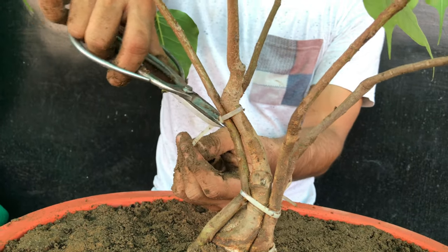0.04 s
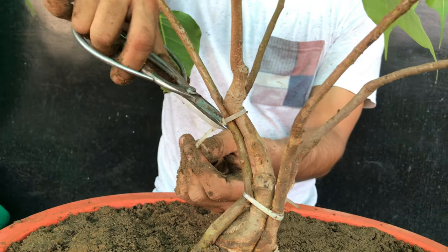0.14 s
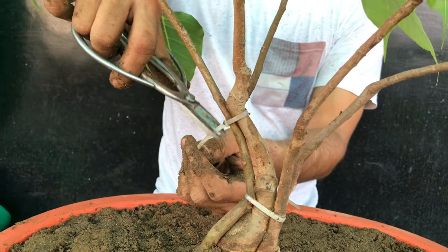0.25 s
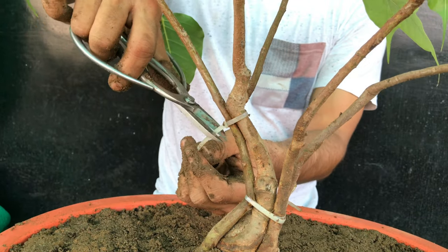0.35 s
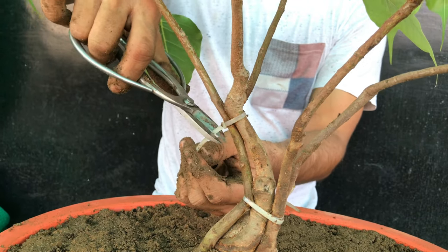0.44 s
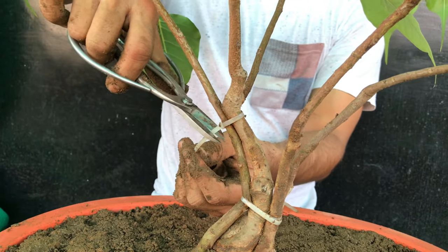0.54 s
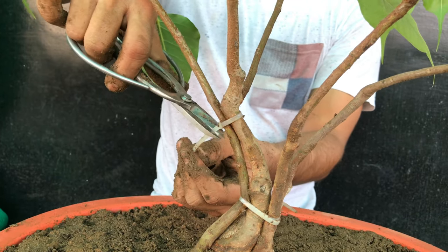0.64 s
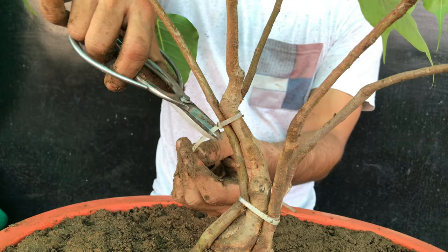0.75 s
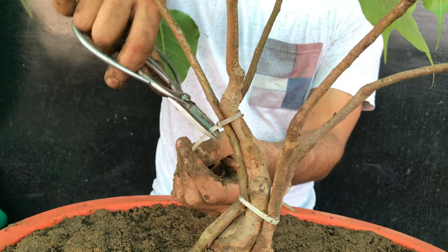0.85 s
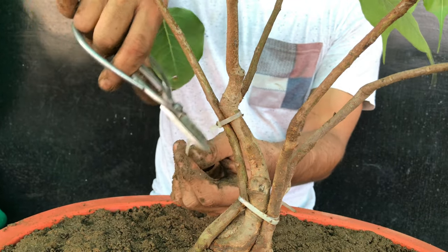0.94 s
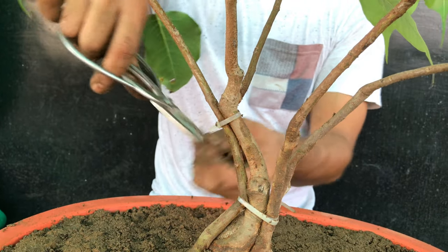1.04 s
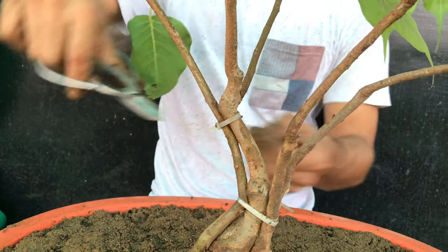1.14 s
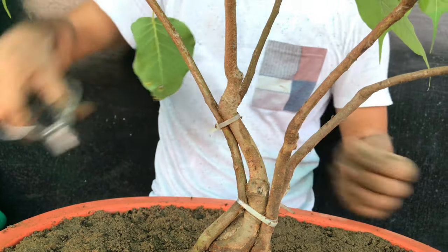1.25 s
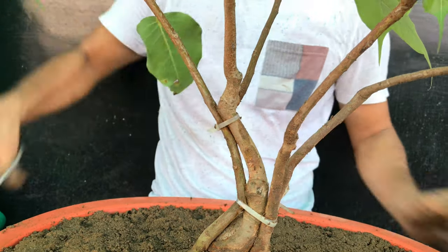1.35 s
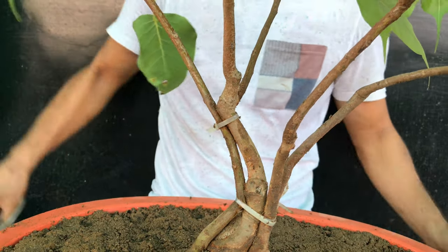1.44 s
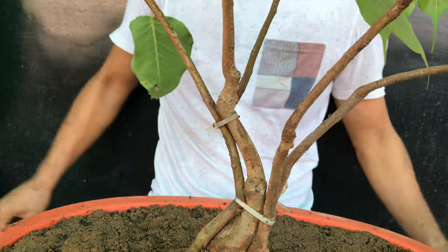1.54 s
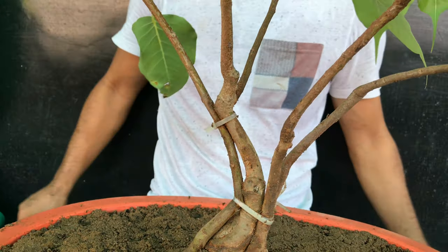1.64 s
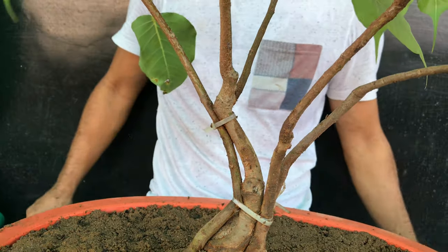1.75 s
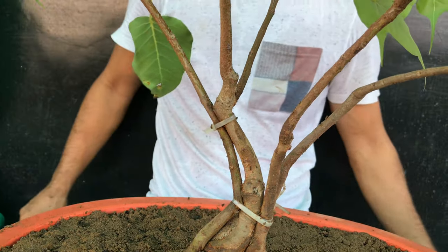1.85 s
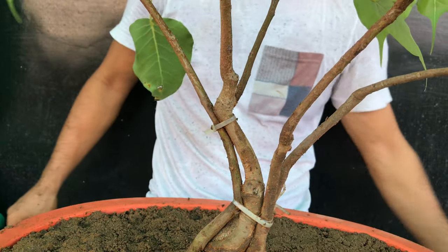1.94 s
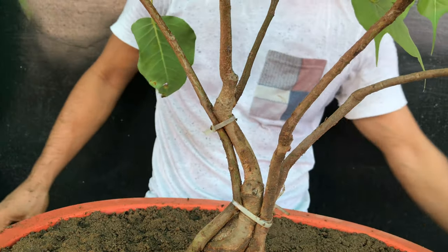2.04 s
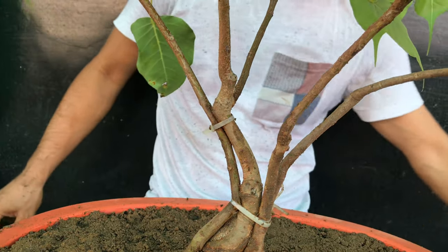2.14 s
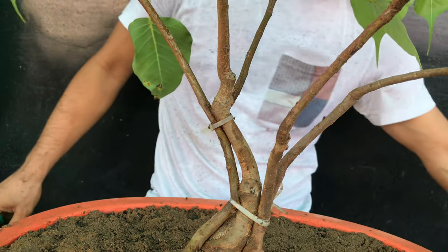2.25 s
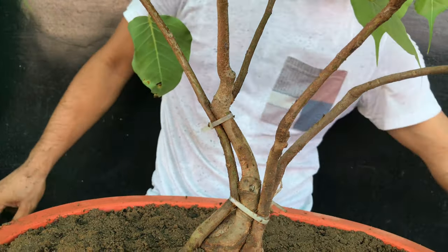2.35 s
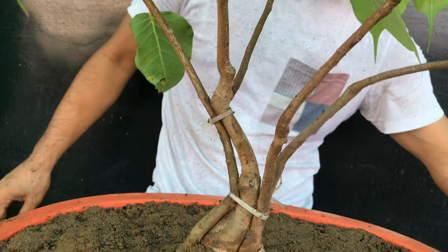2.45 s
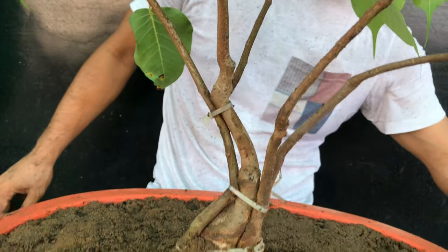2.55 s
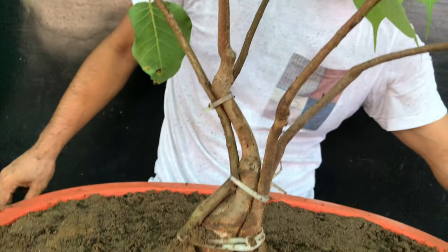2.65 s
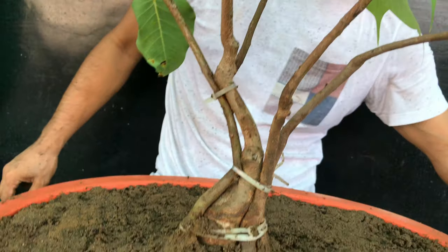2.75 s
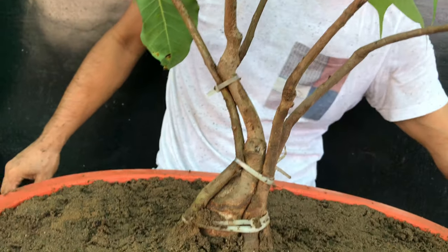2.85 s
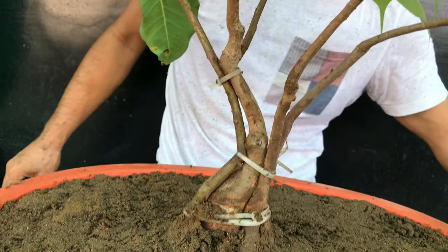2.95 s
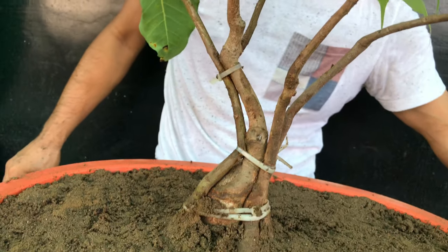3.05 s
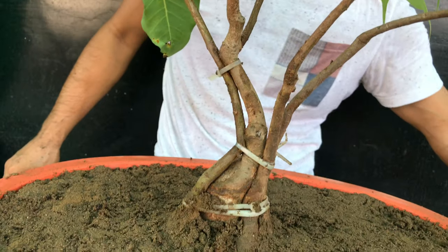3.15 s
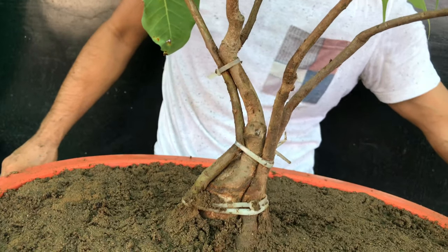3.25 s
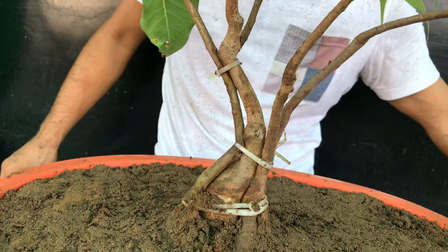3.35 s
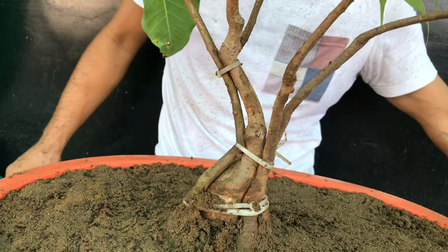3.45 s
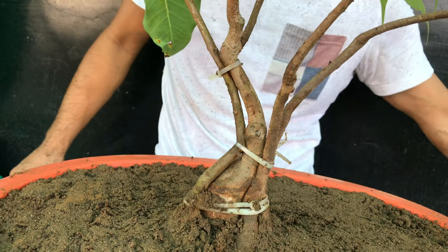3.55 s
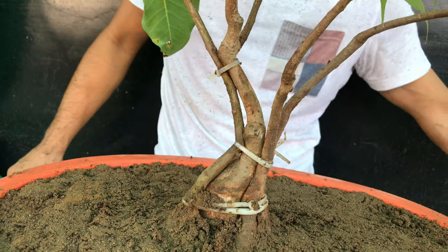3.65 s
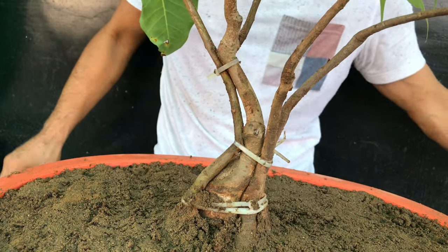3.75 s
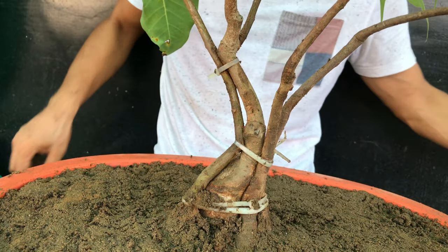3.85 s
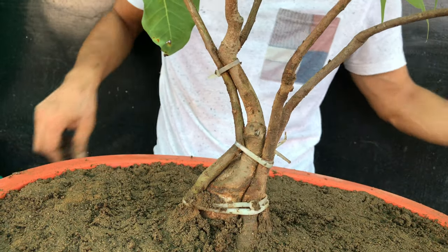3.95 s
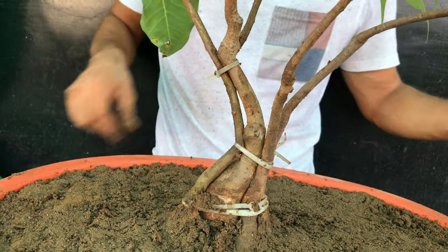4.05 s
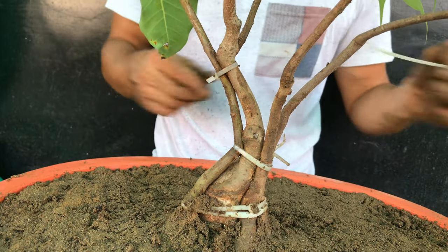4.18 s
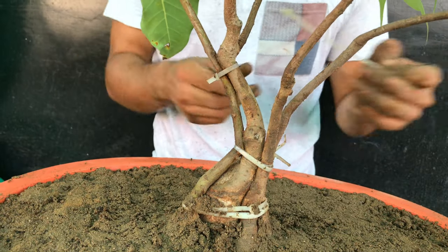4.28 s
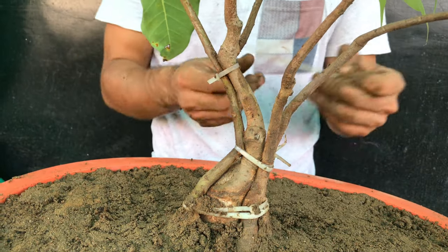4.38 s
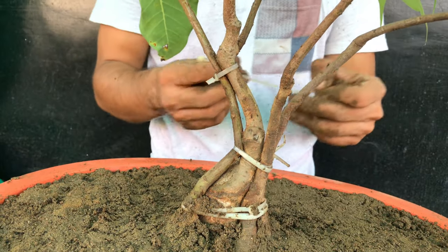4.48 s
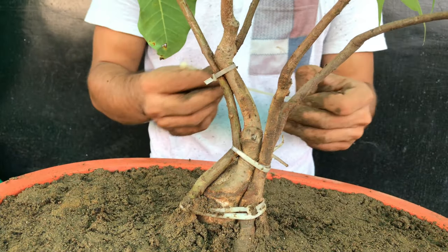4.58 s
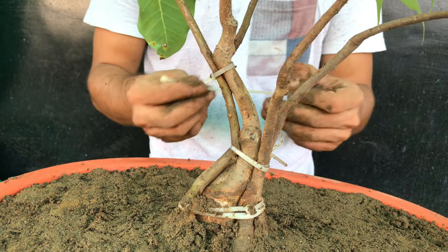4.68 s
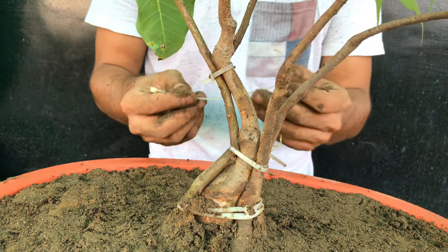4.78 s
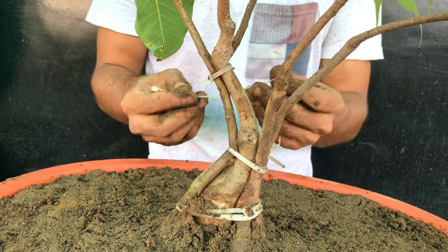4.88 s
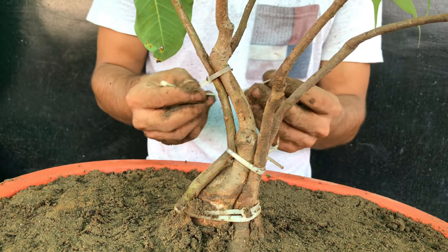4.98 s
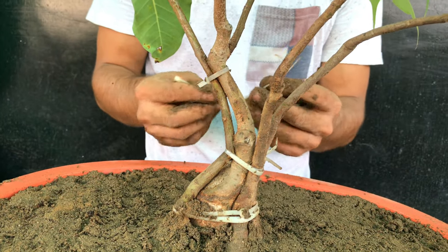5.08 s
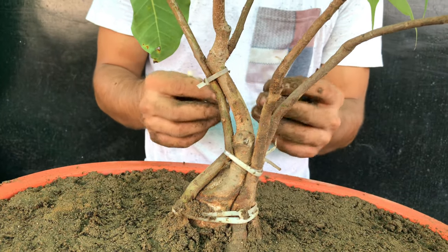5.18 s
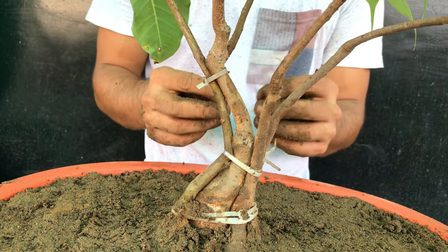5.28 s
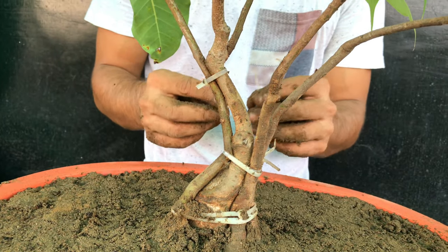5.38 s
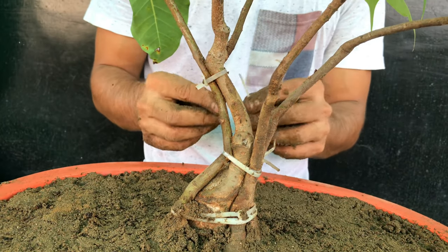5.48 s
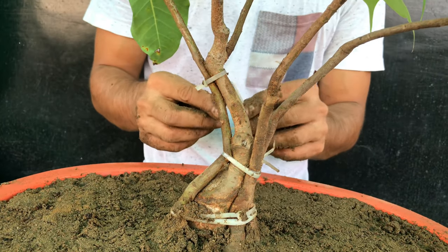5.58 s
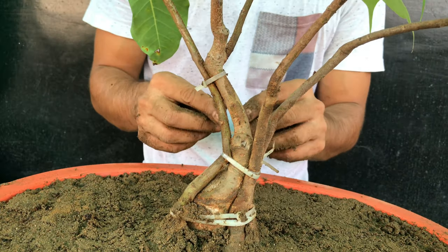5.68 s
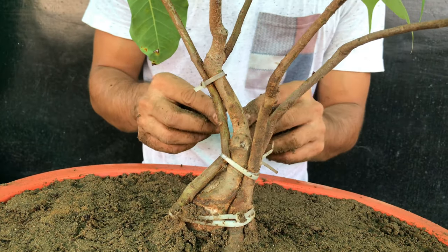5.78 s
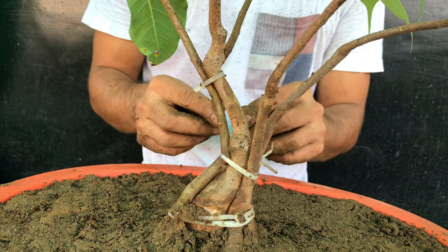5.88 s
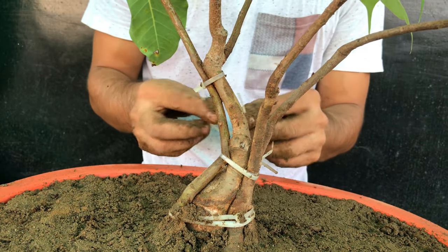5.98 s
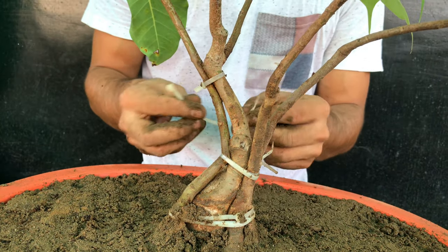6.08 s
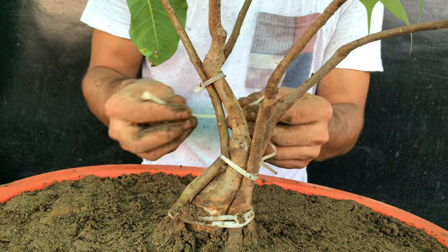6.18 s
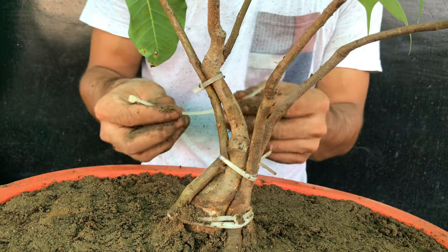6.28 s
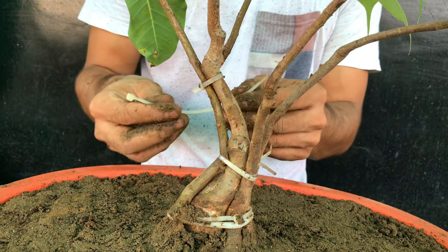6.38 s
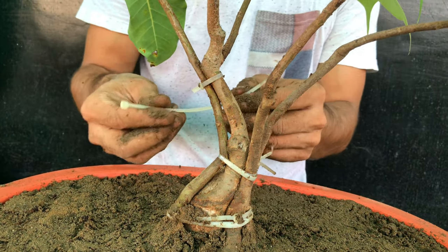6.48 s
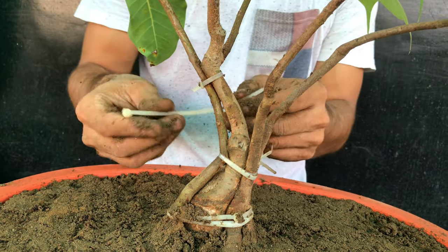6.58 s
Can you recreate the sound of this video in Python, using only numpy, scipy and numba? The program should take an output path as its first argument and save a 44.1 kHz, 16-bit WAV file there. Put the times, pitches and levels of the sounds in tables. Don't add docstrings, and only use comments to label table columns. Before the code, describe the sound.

One sharp metallic scissor snip, then a clattering drop to the ground, gritty rustles and plastic ticks over low town rumble and faint birds.

```python
import sys
import numpy as np
from scipy import signal
from scipy.fft import rfft, irfft
from scipy.io import wavfile
from scipy.ndimage import uniform_filter1d
from numba import njit

SR = 44100
rng = np.random.default_rng(int(sys.argv[2]) if len(sys.argv) > 2 else 0)


def unload_wav(signal):
    wavfile.write(
        sys.argv[1],
        SR,
        np.round(np.clip(np.atleast_2d(signal).T, -1, 1) * 32767).astype(np.int16),
    )


def makeup_ratio(level_db):
    decades = np.asarray(level_db, float) / 20
    return 10 ** decades


N = 291942
T = np.arange(N) / SR


def band(x, hz, width):
    centre_hz, width_hz = min(hz, .45 * SR), min(width, .35 * SR)
    return signal.lfilter(*signal.iirpeak(centre_hz, hz / width_hz, fs=SR), x)


def level(x, db):
    return x * makeup_ratio(db) / np.sqrt(np.mean(x ** 2))


def walk(rate):
    hold = int(SR / rate)
    steps = np.repeat(rng.standard_normal(N // hold + 1), hold)
    return 2.2 * uniform_filter1d(uniform_filter1d(steps, hold), hold)[:N]


def colour(x, spectrum):
    hz, db = np.transpose(spectrum)
    f = np.maximum(np.arange(N // 2 + 1) * SR / N, 1)
    gain_db = np.interp(np.log(f), np.log(hz), db)
    return irfft(rfft(x) * makeup_ratio(gain_db), N)


def ring(x, modes, damp):
    out = 0
    for hz, db, t60 in modes:
        pole = np.exp(2j * np.pi * hz / SR - np.log(1000) / (min(t60, .3) * damp * SR))
        out = out + makeup_ratio(db) * signal.lfilter([1], [1, -pole], x).imag
    return out


def burst(s, db, t60):
    start, size = int(s * SR), 2048
    age = np.arange(size) / SR
    out = np.zeros(N + size)
    out[start:start + size] = makeup_ratio(db) * rng.standard_normal(size) * makeup_ratio(-60 * age / t60)
    return out[:N]


def grains(spread_db, smear):
    size_db = spread_db * np.minimum(rng.exponential(size=N), 5)
    size = uniform_filter1d(makeup_ratio(size_db), int(smear * SR))
    return level(size * rng.standard_normal(N), 0)


def stroke(s, hold, db, rise_db_s, fall_db_s):
    rise_db, fall_db = (s - T) * rise_db_s, (T - s - hold) * fall_db_s
    return makeup_ratio(db - np.maximum(np.maximum(rise_db, fall_db), 0))


def note(s, length, hz0, hz1, db, flutter_db):
    age = np.clip((T - s) / length, 0, 1)
    hz = hz1 + (hz0 - hz1) * (1 - age) ** 1.6
    envelope = makeup_ratio(db + flutter_db) * np.sqrt(np.sin(np.pi * age))
    return envelope * np.sin(2 * np.pi * np.cumsum(hz) / SR)


def town():
    # f/Hz, density/dB
    roar_spectrum = [(30, -32.5), (45, -3), (150, -1.5), (291, -12), (443, -23.5), (547, -21.5), (659, -26),
                     (1240, -25.5), (4500, -41.5), (4800, -46), (8700, -53), (9950, -45), (10250, -58),
                     (15700, -55.5)]
    # t/s, level/dB, brightness/dB
    swell = [(0, .5, 0.5), (1.4, -1.5, 1), (2.2, -1, .5), (3, 0.6, 1), (3.7, -0.3, 1.1), (4.4, 0.9, 2.2),
             (5, 0, 0.3), (5.5, 2, 0.5), (6, 0.6, -0.5), (6.62, -0.3, -1.2)]
    roar = level(colour(rng.standard_normal(N), roar_spectrum), -41.5)
    rumble = signal.sosfiltfilt(signal.butter(2, 350, fs=SR, output="sos"), roar)
    hiss = signal.sosfiltfilt(signal.butter(2, 2200, "high", fs=SR, output="sos"), roar)
    middle = roar - rumble - hiss
    s, db, bright_db = np.transpose(swell)
    out = 0
    for part, lean in ((rumble, -1), (middle, 0), (hiss, 1)):
        swell_db = np.interp(T, s, db + lean * bright_db)
        out = out + part * makeup_ratio(swell_db + 0.33 * walk(4.6))
    return out


def traffic():
    # f/Hz, width/Hz, level/dB
    idle_lines = [(69.14, 1.9, -46.5), (78.26, 1.6, -53), (48, 8.2, -53)]
    # t/s, firing rate/Hz, level/dB, overtone number that the street favours
    vehicle = [(0, 53.2, -42, 3.3), (.6, 52.75, -49.5, 2.95), (1.4, 48.95, -49.5, 3.5),
               (2.2, 48, -48.5, 3.4), (2.6, 46.86, -42, 4.0), (3.1, 45.77, -39, 4.35),
               (3.5, 45.35, -41, 4.1), (3.8, 45.3, -51, 3.17), (4.3, 45.63, -49, 4.38),
               (5.2, 46.22, -41, 2.69), (5.55, 45.9, -52, 2.4), (5.9, 45.95, -45, 2.6),
               (6.62, 45.95, -46, 2.7)]
    # t/s, length/s, f/Hz, level/dB
    whines = [
        (3.9, .85, 1520, -62),
        (4.15, .3, 1552, -66),
        (4.0, .36, 1265, -67),
        (5.6, .27, 1465, -66),
        (4.35, .5, 580, -63),
        (5.62, .16, 730, -65),
    ]
    idle = sum(level(band(rng.standard_normal(N), hz, w), db) for hz, w, db in idle_lines)
    s, *controls = np.transpose(vehicle)
    hz, db, favoured = (np.interp(T, s, c) for c in controls)
    turn = 2 * np.pi * np.cumsum(hz) / SR
    passing = 0
    for k in range(2, 6):
        overtone_db = db + 1.5 - 8.5 * abs(k - favoured) + 2.0 * walk(5.4)
        passing = passing + makeup_ratio(overtone_db) * np.sin(k * turn)
    waver_db = 2 + 2.2 * walk(110)
    return idle + passing + sum(note(s, length, hz, hz, db, waver_db) for s, length, hz, db in whines)


def rustle():
    # t/s, hold/s, level/dB, lower part relative level/dB
    movements = [(0, .015, -69, -5), (.09, 0.19, -81, -1), (0.763, 0.15, -69, -16), (1.09, .06, -78.5, 4),
                 (1.63, 0.099, -81, -11), (2.42, .08, -74, -4), (2.52, .06, -68, -6), (2.61, .07, -73, 0),
                 (2.695, .05, -64, -7), (2.813, 0.02, -64, 0), (2.91, 0.026, -67, 0),
                 (2.98, 0.098, -74, -1), (3.108, 0.0091, -62, -8), (3.14, .155, -72, 2.5),
                 (3.34, .08, -76, -5), (3.55, 0.14, -84, 3), (3.71, .04, -70, -2), (4.029, 0.13, -86, 8),
                 (4.948, .05, -83, 8), (5.013, .02, -75, 7), (5.337, .07, -88, 1), (5.9, 0.26, -86, 6),
                 (6.191, .05, -78, 2), (6.45, .17, -84, 3)]
    grit = grains(spread_db=8.5, smear=0.0015)
    high = level(band(grit, 13500, 6000), 0)
    low = level(band(grit, 4800, 4500), 0)
    out = makeup_ratio(-88) * high + makeup_ratio(-81) * low
    for s, hold, db, rel_db in movements:
        gain = stroke(s, hold, db, rise_db_s=800, fall_db_s=700.5)
        out = out + gain * (high + makeup_ratio(rel_db) * low)
    return out


def ticks():
    # t/s, peak level/dB, centre f/Hz, bright edge relative level/dB
    tick_events = [(0.5594, -62, 4650, -6), (0.6644, -63, 4710, 0), (1.5844, -57, 9880, -9),
                   (2.5087, -46, 5600, -10), (2.591, -45, 7770, -14), (2.6344, -52, 4660, -10),
                   (2.6914, -39, 6880, -10), (2.7202, -46.5, 11700, -10), (2.7444, -52, 14600, -10),
                   (2.8314, -52, 5450, -10), (2.8495, -53, 6090, -10), (2.9028, -49, 5120, -10),
                   (2.9394, -54, 4720, -6), (3.0293, -44, 5560, -10), (3.1122, -52, 13900, -6),
                   (3.2494, -45, 4540, -10), (3.291, -51, 7010, -10), (3.3493, -51, 8210, -6),
                   (3.4101, -50, 9610, -10), (3.4694, -60, 10100, -6), (3.5394, -62, 4540, -3),
                   (3.7094, -55, 12200, -10), (3.7394, -58, 4704, -6), (3.9898, -38.5, 4700, -5),
                   (3.9974, -52, 4510, -8), (4.456, -58, 5030, 6), (5.0352, -37, 4800, -10),
                   (5.255, -43.5, 6400, 0)]
    thin = signal.butter(2, 2600, "high", fs=SR, output="sos")
    out = 0
    for s, db, hz, edge_db in tick_events:
        edge = burst(s, db, t60=0.0027)
        body = edge + burst(s, db - 4, t60=0.015)
        out = out + signal.sosfilt(thin, band(body, hz, .65 * hz))
        out = out + makeup_ratio(edge_db) * band(edge, 14000, 9000)
    return out


def rub():
    # f/Hz, width/Hz, gain/dB
    strap_bands = [(6400, 2200, -6.5), (10100, 2650, -5), (14200, 2000, -1.5)]
    slide = grains(spread_db=4.0, smear=.003)
    strap = sum(makeup_ratio(g_db) * band(band(slide, hz, w), hz, w) for hz, w, g_db in strap_bands)
    end_s = 4.79
    gain = stroke(4.51, hold=0.14, db=-62, rise_db_s=700, fall_db_s=80) * (T < end_s)
    return gain * level(strap, 0)


def snip():
    # t/s, peak level/dB
    contacts = [(.8682, -46), (.8874, -40), (0.8903, -8), (0.8914, -9), (0.8924, -10), (0.895, -19),
                (0.8978, -20.5), (0.907, -26), (1.0925, -49), (1.097, -56), (1.132, -57)]
    # f/Hz, level/dB, t60/s
    blade_modes = [(2566, -18, 0.08), (4340, -29.5, 0.013), (6200, 2, 0.01), (8430, -6, .008),
                   (9950, -4.5, .008), (10950, -12, 0.011), (11340, -9.5, 0.043), (12230, -6, .008),
                   (13100, -6, .007), (14600, -12, .01), (15100, 1, 0.013), (16400, -16.5, .006)]
    s, db = np.transpose(contacts)
    taps = np.zeros(N)
    taps[(s * SR).astype(int)] = makeup_ratio(db)
    crack = sum(burst(s, db, t60=0.0085) for s, db in contacts)
    blades = ring(taps, blade_modes, damp=1)
    steel = makeup_ratio(-8.5) * blades + makeup_ratio(0.5) * band(crack, 12200, 8100)
    return signal.sosfilt(signal.butter(2, 2000, "high", fs=SR, output="sos"), steel)


def drop():
    # t/s, peak level/dB, thud relative level/dB
    landings = [
        (1.7445, -35, -16),
        (1.7699, -26, 12),
        (1.785, -23, 1),
        (1.7905, -28, 5),
        (1.838, -36, 7),
        (1.862, -53, 19),
    ]
    # t/s, hold/s, level/dB, rise/dB per s, fall/dB per s
    chatter_strokes = [
        (1.7438, 0.0018, -39, 20000, 1500),
        (1.762, .07, -43.5, 1000, 2000),
        (1.773, 0.012, -28.5, 2500, 520),
        (1.84, 0.0011, -28.5, 3000, 2300),
    ]
    # f/Hz, level/dB, t60/s
    loose_modes = [(3770, -20, 0.044), (5620, -13, 0.05), (6920, -16.5, 0.12), (8760, -16, 0.11),
                   (9200, -18, 0.12), (9800, -21, 0.092), (11000, -25, .1), (12200, -23, .1),
                   (13150, -11, .12), (13300, -21, .12), (13900, -19, .1), (14600, -12, .08),
                   (14840, 0.5, 0.067), (15300, -13, 0.046)]
    # f/Hz, density/dB
    clatter = [(200, -22), (260, -11.5), (600, -6), (1200, -9.5), (1600, -17), (3000, -20), (5300, -18.5),
               (10300, -14), (15100, -13), (16500, -15.5)]
    shake = sum(stroke(*row) for row in chatter_strokes)
    chatter = shake * grains(spread_db=5.5, smear=0.00017)
    knocks = sum(burst(s, db, t60=0.0065) for s, db, _ in landings)
    thuds = sum(burst(s, db + thud_db, t60=0.011) for s, db, thud_db in landings)
    hits = chatter + knocks
    steel = makeup_ratio(-20.5) * ring(hits, loose_modes, damp=0.27)
    ground = band(thuds, 460, 460) + makeup_ratio(5) * band(thuds, 230, 160)
    return steel + makeup_ratio(10.0) * colour(hits, clatter) + makeup_ratio(-2.5) * ground


def birds():
    # t/s, length/s, f/Hz, level/dB
    squeaks = [(3.78, .08, 3470, -61), (3.79, .06, 6900, -76), (3.8, .05, 8500, -75), (3.3, .05, 8300, -75),
               (6.56, .06, 3410, -61), (3.89, .055, 3480, -70), (4.085, .04, 4620, -70),
               (4.32, .05, 3570, -67), (4.33, .18, 3250, -68), (4.44, .045, 3620, -65),
               (4.955, .03, 4400, -66), (5.5, .28, 3550, -73), (5.57, .07, 4450, -74),
               (5.65, .05, 3200, -69), (5.82, .07, 2350, -69), (5.885, .03, 3600, -64)]
    # t/s, length/s, starting f/Hz, level/dB, upper voice relative level/dB
    falls = [(3.86, .08, 5000, -70, -9), (4.107, .075, 4700, -66, -9), (4.385, .08, 4650, -72, -6),
             (4.68, .09, 4300, -68, -4), (4.97, .1, 4450, -68, -5), (5.318, .08, 4800, -66, -20),
             (5.595, .08, 4200, -70, -14), (5.825, .05, 3900, -70, -20), (5.87, .045, 4800, -68, -20)]
    rest_hz, sink_s = 3000, .05
    repeat_s, upper_hz = .027, 1250
    flutter_db, song = 1.6 * walk(200), 0
    for s, length, hz, db, upper_db in falls:
        end_hz, again = rest_hz + (hz - rest_hz) * np.exp(-length / sink_s), s + repeat_s
        song = song + note(s, length, hz, end_hz, db, flutter_db)
        song = song + note(again, length, hz, end_hz, db, flutter_db)
        song = song + note(again, length, hz + upper_hz, end_hz + upper_hz, db + upper_db, flutter_db)
    for s, length, hz, db in squeaks:
        song = song + note(s, length, hz, hz, db, flutter_db / 2)
    echoes = rng.standard_normal(8192) * makeup_ratio(-60 * np.arange(8192) / SR / .3)
    echoes = echoes / np.sqrt(np.sum(echoes ** 2))
    return makeup_ratio(1.5) * song + makeup_ratio(-1.5) * signal.fftconvolve(song, echoes)[:N]


def yard(x):
    t60_s, treble_t60_s, tail_db = 0.22, 0.18, -8
    age = np.arange(16384) / SR
    noise = rng.standard_normal(16384) * np.clip(age / 0.0038 - .4, 0, 1)
    low = signal.sosfiltfilt(signal.butter(1, 8000, fs=SR, output="sos"), noise)
    tail = low * makeup_ratio(-60 * age / t60_s) + (noise - low) * makeup_ratio(-60 * age / treble_t60_s)
    return makeup_ratio(tail_db) * signal.fftconvolve(x, tail / np.sqrt(np.sum(tail ** 2)))[:N]


def scene():
    near = rustle() + ticks() + rub() + snip() + drop()
    far = town() + traffic() + birds()
    return (near + yard(near) + far)[None]


@njit
def follow(x, fall):
    y, e = np.empty(len(x)), 0.
    for i in range(len(x)):
        e = max(abs(x[i]), e * fall)
        y[i] = e
    return y


def top_cut(x):
    return signal.sosfilt(signal.butter(12, 17320, fs=SR, output="sos"), x)


def record(dry):
    peak = follow(dry[0], makeup_ratio(-130 / SR))
    duck_db = -.22 * np.maximum(20 * np.log10(peak + 1e-9) + 26, 0)
    duck_db = signal.lfilter([.0012], [1, .0012 - 1], duck_db)
    mix = 0.96 * np.tanh(dry[0] * makeup_ratio(duck_db) / 0.85)
    return top_cut(mix)


dry = scene()
out = record(dry)
unload_wav(out)
```